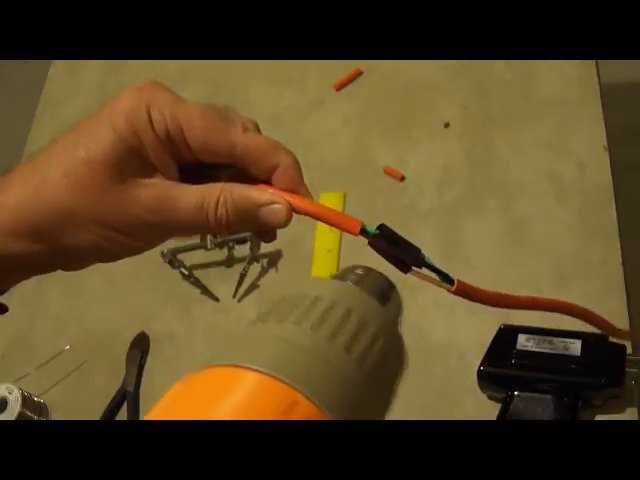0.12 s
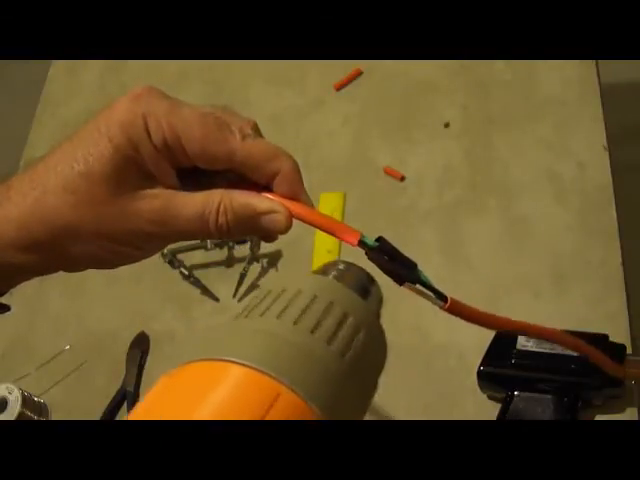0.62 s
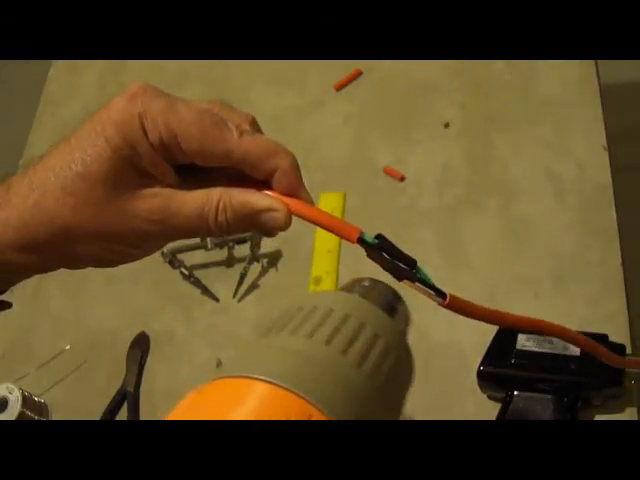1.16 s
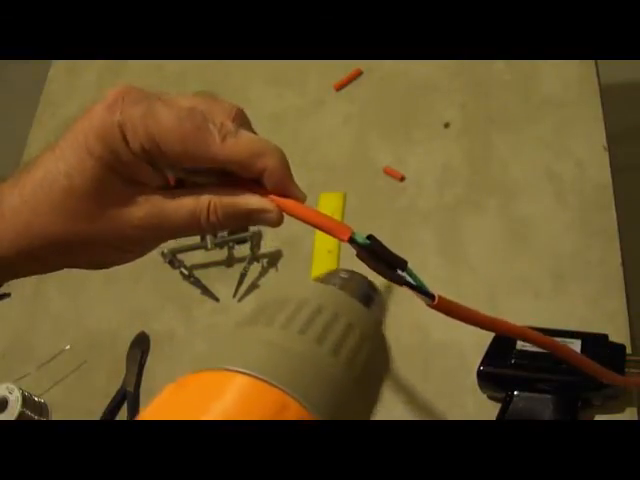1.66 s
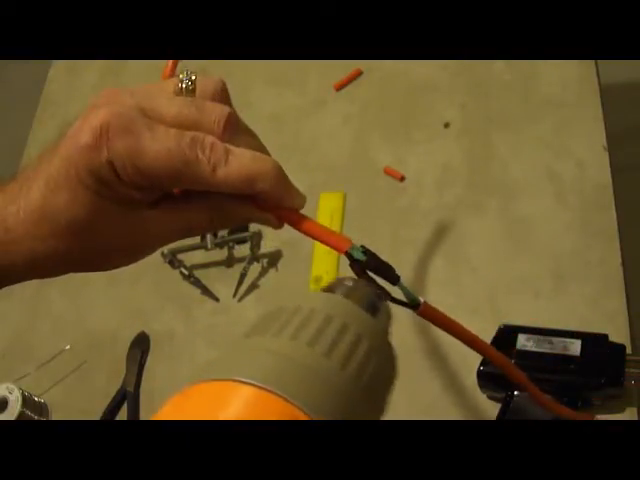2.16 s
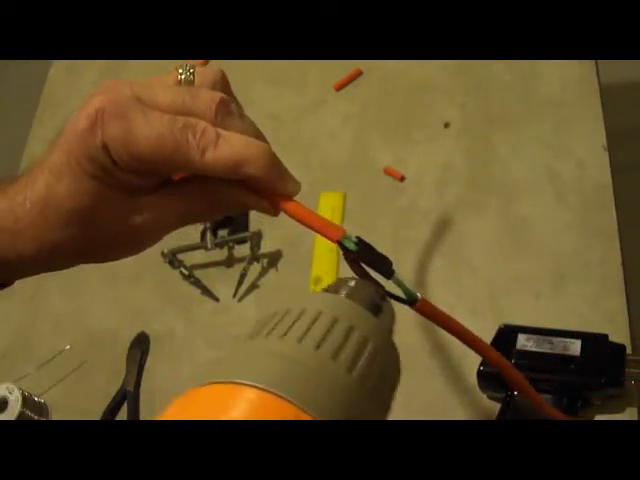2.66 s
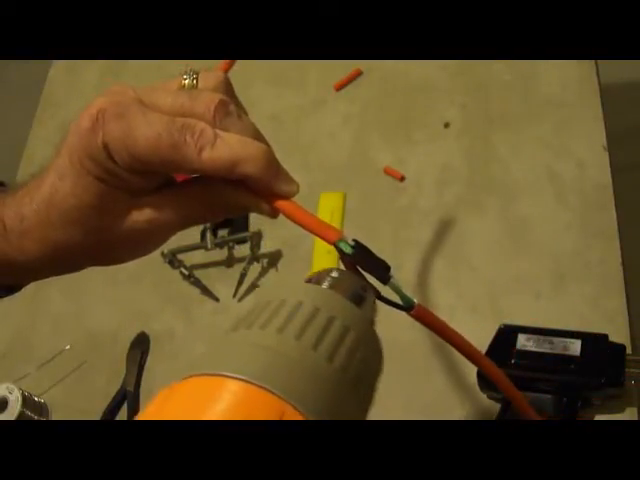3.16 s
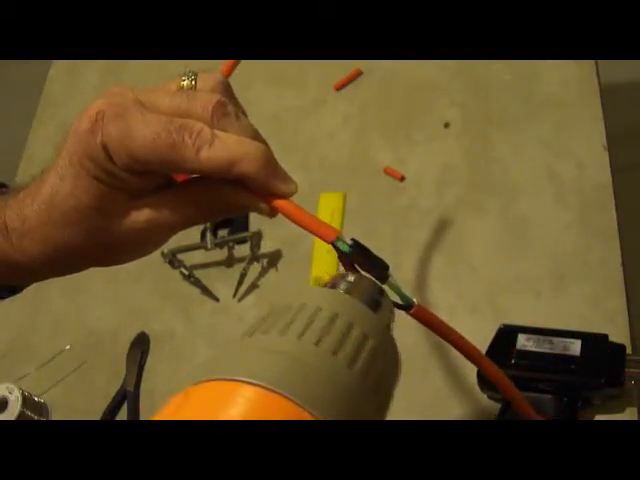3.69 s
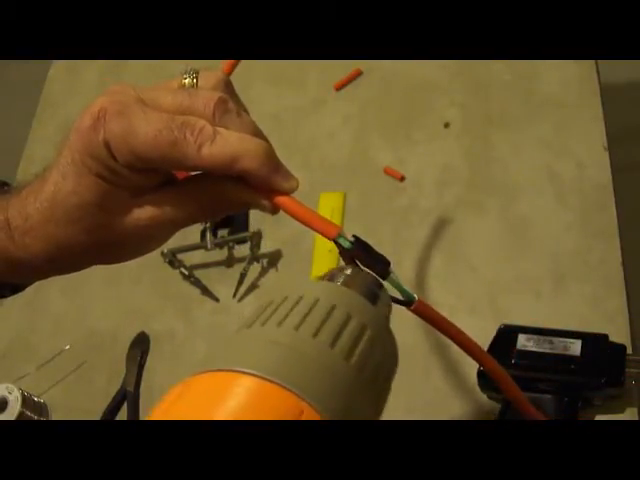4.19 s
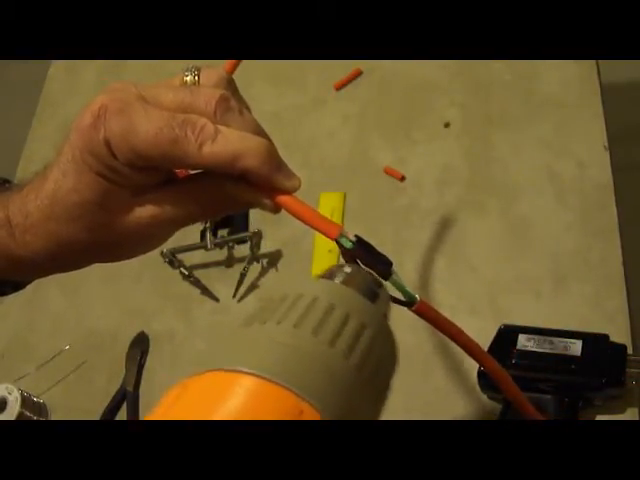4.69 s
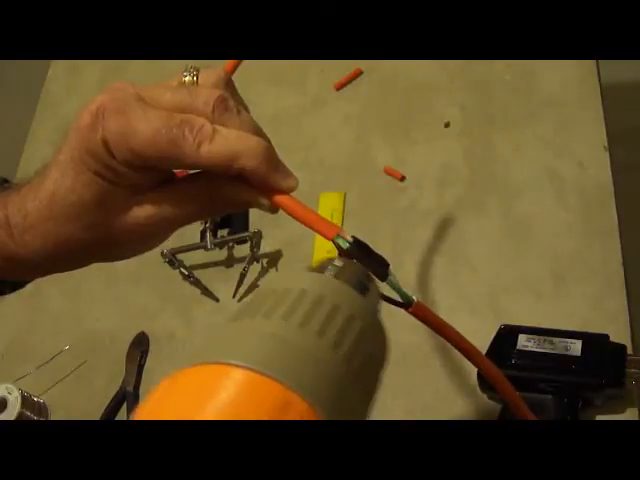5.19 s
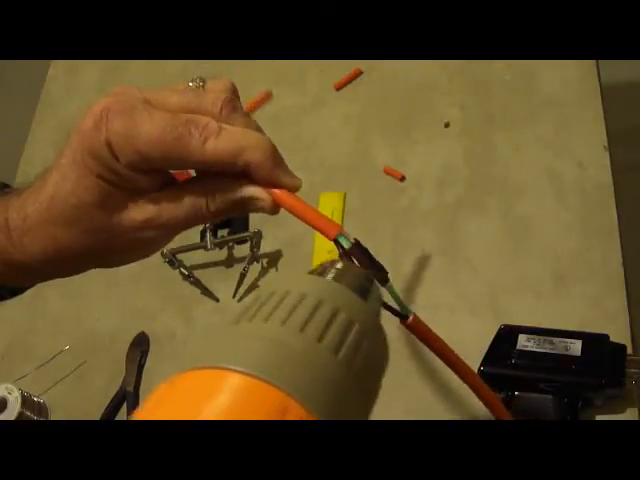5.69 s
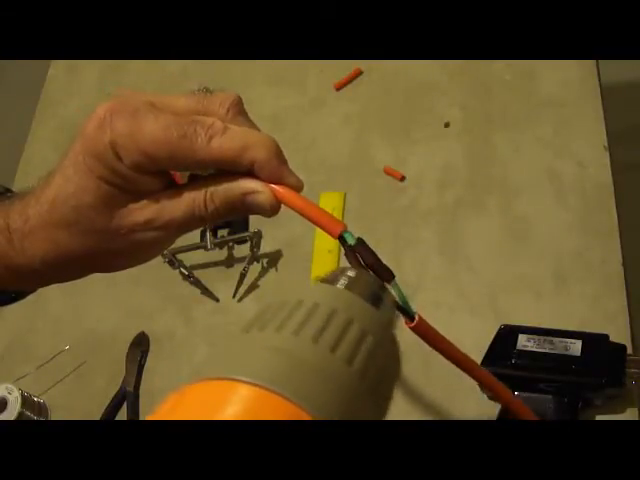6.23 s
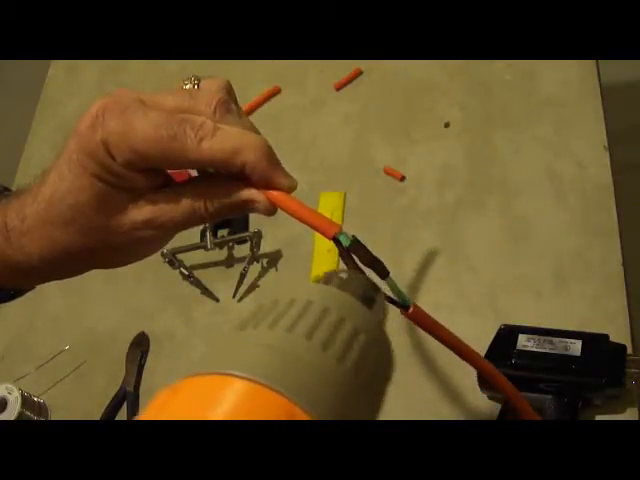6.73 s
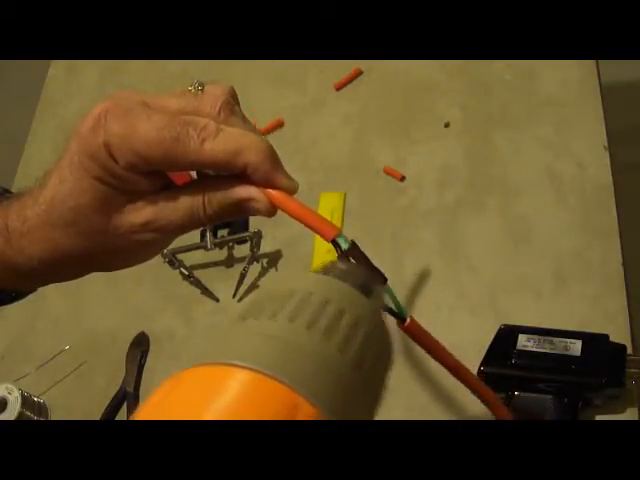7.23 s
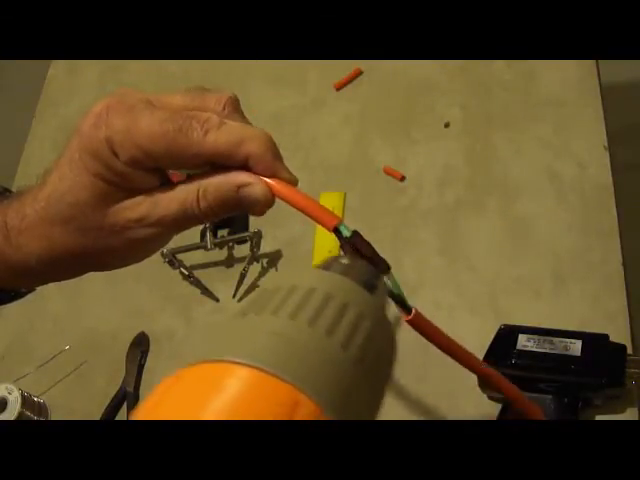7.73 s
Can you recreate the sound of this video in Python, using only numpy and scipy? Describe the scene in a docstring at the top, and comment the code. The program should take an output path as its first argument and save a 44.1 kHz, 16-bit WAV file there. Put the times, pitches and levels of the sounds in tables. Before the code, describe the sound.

Continuous loud blowing from a heat gun near the microphone, hollow airy roar with a steady buzz-free motor hum, barely changing throughout.

```python
"""Hand-held heat gun

A heat gun runs steadily indoors, close to a small camera microphone.
Its air is noise shaped by the resonances of barrel and nozzle; its fast motor is a stack of sine tones
at multiples of the shaft speed. The hand turns the gun a little, which shifts the balance of the sound.
A few faint bumps, made as short low thuds, come through the bench."""
import sys
import numpy as np
from scipy import signal
from scipy.fft import rfft, irfft, next_fast_len
from scipy.io import wavfile
from scipy.ndimage import uniform_filter1d, map_coordinates

SR = 44100
rng = np.random.default_rng(int(sys.argv[2]) if len(sys.argv) > 2 else 0)


def attenuation_scalar(level_db):
    """Turn a level in dB into a linear amplitude multiplier (20 dB per decade)."""
    decades = np.asarray(level_db, float) / 20
    return 10 ** decades


def int16_out(signal):
    """Quantize to a 16-bit WAV file."""
    q = np.round(np.clip(np.atleast_2d(signal).T, -1, 1) * 32767)
    wavfile.write(sys.argv[1], SR, q.astype(np.int16))


N = 346626  # length in samples

# Resonances of barrel, housing and bench in the body of the rush, before the rush is scaled.
# Each row: centre in Hz, width in Hz, relative level in dB.
BARREL_RESONANCES = [(380, 14.6, -16), (530, 93, -28.5), (620, 56, -26), (694, 46, -15.5), (765, 44, -6.5),
                     (806.5, 18, -2.5), (863, 126, -5), (1041, 150, -6.5), (1249, 235, 1.5),
                     (1443, 100, -8), (1501, 12, -5.5), (1817, 170, -5), (2040, 313, -4.5),
                     (2256, 178, -5.5), (2470, 190, -13.5)]
# Cross resonances of the nozzle in the hiss, before the rush is scaled.
# Each row: centre in Hz, width in Hz, relative level in dB.
NOZZLE_RESONANCES = [(3007, 110, -3), (3213, 255, -4), (3440, 110, -3.5), (3570, 85, -7.5),
                     (3782, 227, 0.5), (3976, 250, -2), (4200, 230, -8.5), (5050, 200, -21.5),
                     (5370, 340, -7.5), (5665, 370, -10.5), (6420, 560, -24.5), (7640, 370, -24),
                     (9150, 250, -23)]
# Broad turbulence under the barrel resonances. Each row: frequency in Hz, relative level in dB per Hz.
BODY_TURBULENCE = [(20, -50), (40, -58), (100, -58), (200, -37), (270, -25.5), (450, -21), (1000, -17.5),
                   (1600, -13), (2700, -21), (4000, -58)]
# Broad turbulence under the nozzle resonances. Each row: frequency in Hz, relative level in dB per Hz.
HISS_TURBULENCE = [(1500, -57.5), (2700, -8), (4600, -11), (6200, -16.5), (8000, -20.5), (10300, -24),
                   (12000, -21)]
# Aim of the gun. Each row: time in seconds, how far it is turned away from 0 to 1.
GUN_AIM = [(0, .15), (.8, 0), (2.6, .05), (3.4, .3), (4.2, .55), (5.2, .45), (6, .65), (6.8, .9), (7.86, 1)]
# Colour of the air when the gun is fully turned away. Each row: frequency in Hz, change in dB.
AIR_WHEN_TURNED = [(300, 0.52), (1200, -0.48), (2100, 1.06), (3000, .8), (3900, -1.5), (5500, 0.36),
                   (8000, -0.13)]
# Speed of the motor shaft, before its slight hunting. Each row: time in seconds, turns a second in Hz.
SHAFT_SPEED = [(0, 297.3), (.25, 297.25), (.75, 297.9), (1.6, 298.0), (2.2, 297.9), (2.4, 297.4),
               (3.0, 296.8), (3.4, 297.7), (4.1, 297.7), (4.6, 297.55), (5.6, 297.95), (6.55, 297.65),
               (7.05, 296.95), (7.6, 297.7), (7.86, 297.7)]
# Motor and fan tones, before they waver and the gun turns.
# Each row: multiple of the shaft speed, rms level in dB.
SHAFT_TONES = [(1, -34.9), (2, -37.3), (3, -39.3), (4, -29.5), (5, -27.6), (6, -34.0), (7, -41.5),
               (10, -41.7), (11, -52.5), (12, -36.2), (13, -34.8), (14, -53.6), (15, -54.0), (16, -56.7),
               (17, -60.8), (20, -49.2), (21, -52.7), (22, -63.6), (23, -61.1), (24, -60.6), (25, -59.0),
               (26, -51.4), (27, -64.2), (28, -68.6), (29, -61.4), (30, -55.4), (31, -62.1), (32, -61.3),
               (33, -70.4), (34, -62.4)]
# Tones split off by the pulsing mains torque, before they waver and the gun turns.
# Each row: multiple of the shaft speed, offset in Hz, rms level in dB.
MAINS_TONES = [(5, 120, -40.5), (12, 120, -51), (20, 120, -56.5)]
# Change of the tones from not turned to fully turned away. Each row: frequency in Hz, change in dB.
TONES_WHEN_TURNED = [(300, .9), (600, -.4), (1500, -1), (3000, 3), (3600, -2.6), (6000, -3.5), (7700, -5),
                     (9000, -2)]
# Faint low bumps, likely the cable knocking the bench.
# Each row: start in seconds, level in dB before the soft onset and the decay, pitch in Hz.
BENCH_BUMPS = [(1.64, -58, 65), (2.2, -52, 55), (7.6, -54, 110)]


def air():
    """Eddies at the fan swell body and hiss together; turning the gun recolours the rush."""
    eddies = wobble(30)
    body_db = -17 + 0.5 * eddies + 0.3 * wobble(3)
    body = attenuation_scalar(body_db) * rush(BARREL_RESONANCES, BODY_TURBULENCE, skirt=4.85, patchy_db=0.34)
    hiss_db = -24.5 + 0.4 * eddies + 0.44 * wobble(3.13)
    hiss = attenuation_scalar(hiss_db) * rush(NOZZLE_RESONANCES, HISS_TURBULENCE, skirt=4.8, patchy_db=0.74)
    straight = body + hiss
    turned = filtered(straight, lambda hz: attenuation_scalar(along(AIR_WHEN_TURNED, hz)))
    away, = curves(GUN_AIM)
    return (1 - away) * straight + away * turned


def rush(resonances, turbulence, skirt, patchy_db):
    """Patchy noise of rms 1: resonances add in power over a broad base; a higher skirt falls off faster."""
    cells = signal.stft(rng.standard_normal(N), nperseg=512)[2]
    # Smoothing over frequency, then time, makes patches of louder and softer noise
    patches = uniform_filter1d(rng.standard_normal(cells.shape), size=8, axis=0)
    patches = uniform_filter1d(patches, size=6, axis=1)
    patchy_cells = cells * attenuation_scalar(patchy_db * unit(patches))
    noise = signal.istft(patchy_cells, nperseg=512)[1][:N]

    def colour(hz):
        """Resonance peaks and broad turbulence added as power, returned as amplitude."""
        power = attenuation_scalar(2 * along(turbulence, hz))
        for centre_hz, width_hz, db in resonances:
            distance = np.abs(2 * (hz - centre_hz) / width_hz)
            power = power + attenuation_scalar(2 * db) / (1 + distance ** skirt)
        return np.sqrt(power)

    return unit(filtered(noise, colour))


def motor():
    """Sines follow the shaft; the higher the multiple, the more its strength wavers."""
    speed_hz, = curves(SHAFT_SPEED)
    away, = curves(GUN_AIM)
    hunting_hz = 0.054 * wobble(12)  # the speed hunts slightly
    shaft_angle = 2 * np.pi * np.cumsum(speed_hz + hunting_hz) / SR
    t = np.arange(N) / SR
    tones = [(k, 0, db) for k, db in SHAFT_TONES] + list(MAINS_TONES)
    hum = np.zeros(N)
    for k, offset_hz, db in tones:
        waver_db = (0.45 + 0.035 * k) * (0.7 * wobble(2) + wobble(9))
        # Tones beam more sharply than noise, so turning changes them by their own table
        beam_db = (away - 0.45) * along(TONES_WHEN_TURNED, k * speed_hz[0])
        # Tones lag one another, so the hum whines instead of buzzing in pulses
        lag = 1.35 * k * k
        phase = k * shaft_angle + lag + 2 * np.pi * offset_hz * t
        hum += np.sqrt(2) * attenuation_scalar(db + waver_db + beam_db) * np.sin(phase)  # sqrt(2): rms to peak
    return hum


def bumps():
    """Each bump is one low sine with a soft onset that dies within a fraction of a second."""
    attack_s, t60_s = 0.006, 0.12  # time constant of the onset; time to fall by 60 dB
    thuds = np.zeros(N)
    for start_s, db, pitch_hz in BENCH_BUMPS:
        t = np.clip(np.arange(N) / SR - start_s, 0, None)
        onset = 1 - np.exp(-t / attack_s)
        decay = attenuation_scalar(db - 60 * t / t60_s)
        thuds += decay * onset * np.sin(2 * np.pi * pitch_hz * t)
    return thuds


def unit(x):
    """Scales a signal to rms 1."""
    return x / np.sqrt(np.mean(x ** 2))


def curves(rows):
    """Gives one value per sample for each column after the time."""
    s, *columns = np.transpose(rows)
    return [np.interp(np.arange(N) / SR, s, column) for column in columns]


def wobble(rate):
    """Draws a smooth random curve through a given number of random points a second."""
    points = rng.standard_normal(int(N * rate / SR) + 4)
    return map_coordinates(points, [np.arange(N) * rate / SR])


def along(points, hz):
    """Reads a value between (Hz, value) points on a log frequency axis."""
    f, v = np.transpose(points)
    return np.interp(np.log(hz + 1), np.log(f), v)


def filtered(x, response):
    """Multiplies the spectrum of x by a response that depends on frequency."""
    size = next_fast_len(N + SR // 2)  # spare room keeps the end from wrapping onto the start
    hz = np.fft.rfftfreq(size, 1 / SR)
    return irfft(rfft(x, size) * response(hz), size)[..., :N]


def scene():
    """Adds air, motor and bumps at one microphone."""
    mix = air() + motor() + bumps()
    return mix[None]  # one channel


def low_pass(x):
    """Removes everything above the highest recorded frequency."""
    return signal.sosfilt(signal.butter(12, 10450, fs=SR, output="sos"), x)


def record(dry):
    """The camera keeps almost nothing above its band limit, a steep slope around 10336 Hz."""
    top_hz, slope_hz = 10336, 18

    def band_limit(hz):
        """Passes the sound below the limit and falls smoothly to almost nothing above it."""
        return 1 / (1 + np.exp(np.clip((hz - top_hz) / slope_hz, -50, 50)))

    mix = filtered(dry, band_limit)
    return low_pass(mix)


dry = scene()
out = record(dry)
int16_out(out)
```